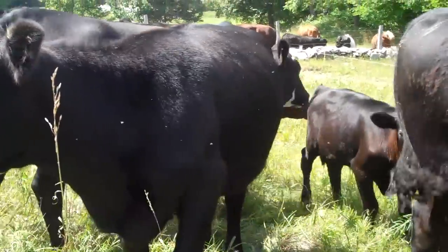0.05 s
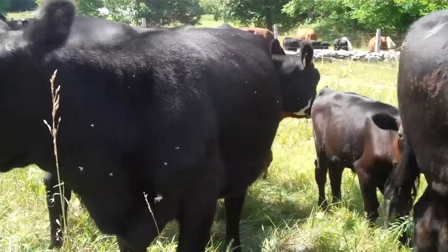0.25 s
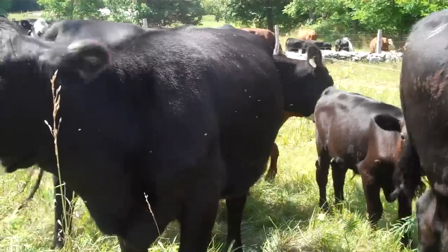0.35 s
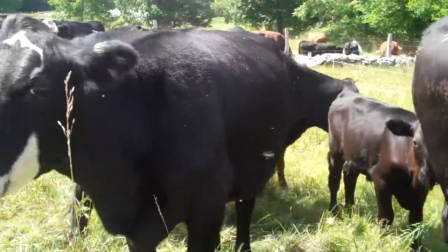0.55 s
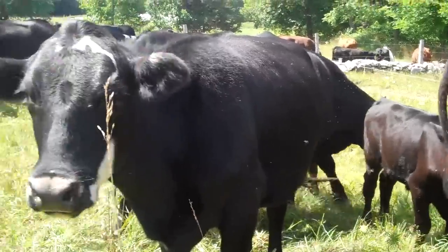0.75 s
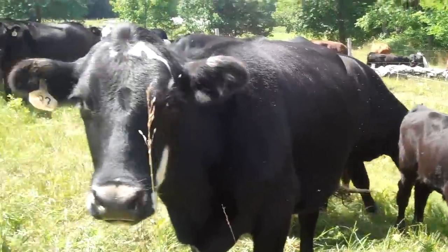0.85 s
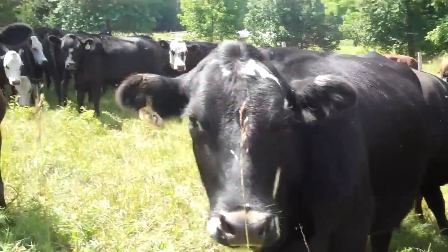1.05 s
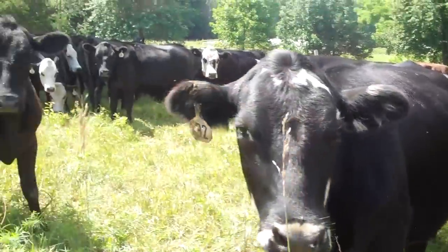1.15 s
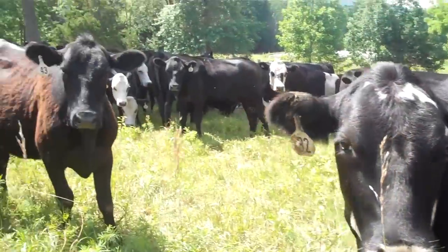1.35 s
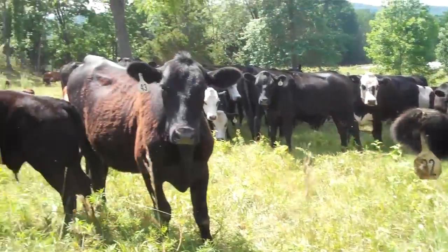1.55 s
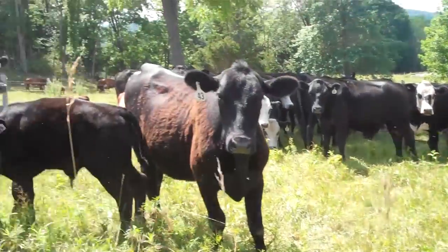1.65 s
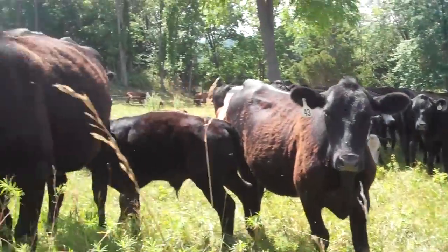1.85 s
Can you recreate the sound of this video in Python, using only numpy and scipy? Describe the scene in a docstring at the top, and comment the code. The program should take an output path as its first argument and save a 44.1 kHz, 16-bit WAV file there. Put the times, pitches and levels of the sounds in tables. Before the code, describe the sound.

Cattle mooing in an open pasture, close handheld microphone: a quieter cow hums and breaks into a high note, a nearer cow swells into a strong brassy moo, then only faint rustle, a soft thud and a farther moo beginning.

```python
"""On a pasture a cow moos close by: the pitch climbs, the mouth opens, the note is held and sinks.
A second cow breaks from a low hum into a high held note and back. Each voice is a train of vocal
pulses and breath noise through throat resonances. The herd lows far off as blurred noise bands, a hoof
thuds softly and a farther cow starts up, over shaped noise for rustling grass and low wind."""
import sys
import numpy as np
from scipy import signal
from scipy.fft import rfft, irfft, next_fast_len
from scipy.io import wavfile
from scipy.ndimage import uniform_filter1d

SR = 44100
rng = np.random.default_rng(int(sys.argv[2]) if len(sys.argv) > 2 else 0)


def to_wav(s):
    """Save 16-bit WAV."""
    ch = np.atleast_2d(s).T  # columns
    pcm = np.round(np.clip(ch, -1, 1) * 32767)  # PCM
    wavfile.write(sys.argv[1], SR, pcm.astype(np.int16))


N = 83790  # samples


def gain_of(db):
    """Decibel law: 20 dB is a tenfold amplitude."""
    return 10 ** (np.asarray(db) / 20)


def evened(x):
    """Power normalisation: scales the whole signal to an RMS of one."""
    return x / np.sqrt(np.mean(x ** 2) + 1e-20)


def smooth_noise(shape, size, passes=1):
    """Low-pass random fluctuation: white noise under a moving average, at an RMS of one."""
    x = rng.standard_normal(shape)
    for _ in range(passes):
        x = uniform_filter1d(x, size=size)
    return evened(x)


def read(points, hz):
    """Interpolation on a logarithmic frequency axis."""
    f, value = np.transpose(points)
    return np.interp(np.log(hz + 1), np.log(f + 1), value)


def columns(table):
    """Linear interpolation in time: each column at every sample, and a gate with 8 ms ends."""
    rows, t = np.array(table, float), np.arange(N) / SR
    start, end = rows[0, 0], rows[-1, 0]
    # a curve that meets either end of the scene stays open there
    opening = np.clip((t - start) / .008 + (start < .01), 0, 1)
    closing = np.clip((end - t) / .008 + (end > N / SR - .02), 0, 1)
    return [np.interp(t, rows[:, 0], c) for c in rows[:, 1:].T] + [opening * closing]


def resonate(x, hz, width):
    """Heterodyne resonance: shifts the curve hz down to zero, smooths with one pole, shifts back."""
    turn = np.exp(2j * np.pi * np.cumsum(hz * np.ones(len(x))) / SR)
    r = np.exp(-np.pi * width / SR)
    return 2 * (turn * signal.lfilter([1 - r], [1, -r], x / turn)).real


def steady(x):
    """Short-time power normalisation: evens the loudness over a few cycles."""
    power = uniform_filter1d(uniform_filter1d(x ** 2, size=900), size=900)
    return x / np.sqrt(abs(power) + 1e-12)


JITTER = .04  # RMS share of the pitch at full breath


def folds(hz, slope_db, breath, sub, count):
    """Glottal source: harmonics of a pitch that breath makes less even, and a puff of air each cycle."""
    breath = np.clip(breath, 0, 1)
    turns = np.cumsum(hz * (1 + JITTER * breath * smooth_noise(N, 200))) / SR
    tone = 0
    for k in range(1, count):
        strength = gain_of(slope_db * np.log2(k)) * (k * hz < 13000)
        tone = tone + strength * np.cos(2 * np.pi * k * turns)
    puffs = (0.35 + np.exp(-(turns % 1) / 1.3)) * rng.standard_normal(N)
    strong_weak = 1 + sub * np.cos(np.pi * turns)  # every other cycle is stronger
    return steady(tone) * strong_weak + breath * evened(puffs)


SPLIT_HZ = 2300  # between the low and the high throat tuning
WAVER_DB = 1.8  # RMS; each resonance swells and fades by chance


def throat(drive, table, mouth, low, high):
    """Formant filtering: resonances whose strengths blend from shut to open mouth and waver."""
    waver = smooth_noise((len(table), N), 1000, passes=2)
    voice = 0
    for k, (f, width, shut_db, open_db) in enumerate(table):
        hz = f * (low if f < SPLIT_HZ else high)
        formant = resonate(resonate(drive, hz, width), hz, 5 * width)
        level_db = shut_db + (open_db - shut_db) * mouth + WAVER_DB * waver[k]
        voice = voice - (-1) ** k * gain_of(level_db) * formant
    return voice


FIELD_DB, FIELD_T60_S = -21, .1  # echo level toward 0 Hz, and decay time
ECHO_BRIGHT_HZ = 2300  # here the echo amplitude has doubled
TREBLE_PAN_DB_PER_KHZ = 1.67  # difference between the ports, growing from 3 to 7 kHz


def placed(x, lead_s, pan_db):
    """Interaural cues: the left port leads by lead_s, the far port is shaded, the field echoes brightly."""
    size = next_fast_len(N + SR)
    hz, t = np.fft.rfftfreq(size, 1 / SR), np.arange(SR // 2) / SR
    tail = rng.standard_normal((2, len(t))) * gain_of(-60 * t / FIELD_T60_S) * (t > .008)
    port = np.array([[1], [-1]]) / 2
    shade_db = TREBLE_PAN_DB_PER_KHZ * np.clip(hz / 1000 - 3, 0, 4) * np.sign(lead_s) * port
    direct = np.exp(2j * np.pi * hz * lead_s * port) * gain_of(shade_db)
    echo = gain_of(FIELD_DB) * (1 + hz / ECHO_BRIGHT_HZ) * rfft(tail / np.linalg.norm(tail[0]), size)
    return irfft(rfft(x, size) * (direct + echo), size)[:, :N] * gain_of(pan_db * port)


# Rustle spectrum. Each row: frequency in Hz, relative density in dB per Hz.
GRASS_SPECTRUM = [(59, -71), (100, -12.5), (300, -19.5), (900, -8.5), (1300, -16), (3000, -21.5),
                  (8160, -24), (10500, -25), (12000, -32), (14000, -31.5)]
# Rustle swells. Each row: time in seconds, level in dB.
GRASS_SWELLS = [(0, -41), (.2, -36), (.5, -31), (.9, -40.5), (1.08, -37.5), (1.13, -52.5), (1.36, -53.5),
                (1.4, -46), (1.44, -54.5), (1.9, -47)]
# Coherence of the two ports. Each row: frequency in Hz, left-right likeness from -1 to 1.
GRASS_LIKENESS = [(60, 0.25), (180, 0.6), (520, 0.92), (1550, 0.68), (4580, 0.083), (13500, -0.21)]
CALM_DB, LOW_SHARE = -54, .55  # below 2 kHz the level follows this share of each swell above calm


def grass():
    """Filtered diffuse noise: the field's rustle and hiss, patchy in time and frequency."""
    frames, hz = N // 128 + 5, np.fft.rfftfreq(512, 1 / SR)
    a, b, c, d, patches = rng.standard_normal((frames, 257, 5)).T
    patches = evened(uniform_filter1d(uniform_filter1d(patches, 12, 0), 10, 1))
    flicker = smooth_noise(frames, 4)
    same = np.clip(read(GRASS_LIKENESS, hz), -1, 1)[:, None]
    left = a + 1j * b
    right = same * left + np.sqrt(1 - same ** 2) * (c + 1j * d)
    spectrum_db = read(GRASS_SPECTRUM, hz)[:, None] + 0.88 * patches + 0.99 * flicker
    z = np.array([left, right]) * gain_of(spectrum_db)
    rustle = evened(signal.istft(z, nperseg=512, noverlap=384)[1][:, :N])
    db = columns(GRASS_SWELLS)[0]
    low = signal.sosfiltfilt(signal.butter(2, 2000, fs=SR, output="sos"), rustle)
    low_db = CALM_DB + LOW_SHARE * (db - CALM_DB)
    return (gain_of(db) * (rustle - low) + gain_of(low_db) * low) * gain_of([[-.8], [.8]])


# Wind strength. Each row: time in seconds, level in dB.
WIND_LEVEL = [(0, -54), (.45, -61), (.55, -62), (.9, -82), (1.1, -66), (1.9, -62)]


def wind():
    """Low-frequency turbulence noise: a lumpy rumble on the microphone, nearly alike in both ports."""
    band = signal.butter(2, [34, 81], "band", fs=SR, output="sos")
    x = signal.sosfilt(band, rng.standard_normal((2, N)))
    apart = .22 * np.array([[1], [-1]])
    return gain_of(columns(WIND_LEVEL)[0]) * evened(x[0] + apart * x[1]) * gain_of([[-1], [1]])


# Second cow's three registers. Each row: time in seconds, pitch in Hz, level in dB,
# overtone slope in dB per octave, breath from 0 to 1.
HUM_REGISTER = [(0.0, 140.5, -37, -11.5, 0.3), (0.04, 159.7, -38.5, -20, 0.3),
                (0.095, 196.4, -35.5, 10.5, 0.9)]
HIGH_REGISTER = [(.07, 490, -52, 9, .3), (.11, 530, -46, 6, .25), (.145, 578, -35, 0, .05),
                 (.2, 579, -31, -1, .03), (.36, 577, -28, -2, .04), (.43, 590, -27, -5, .05),
                 (.455, 585, -32, -8, .05), (.47, 570, -50, -8, .05)]
LOW_REGISTER = [(.45, 266, -51, -11, 0.12), (.49, 248, -36, -36, .1), (.53, 238.5, -27, -28, .1),
                (.56, 206, -32.5, -44, .05), (.65, 203, -38, -14, 0.068), (.69, 222.3, -36.5, -23, 0.12),
                (.79, 212, -42, -34, 0.08), (.84, 204, -44, -4, 0.028), (.885, 138.8, -37.5, 1.5, 0.08),
                (.91, 127, -77, -12, 0.047)]
# Its throat. Each row: resonance in Hz, width in Hz, relative strength in dB.
SECOND_THROAT = [(202, 120, 18.5), (690, 233, 12.5), (960, 190, 12), (1700, 130, 2), (2160, 410, -14.5)]


def second_cow():
    """Source-filter voice with register breaks: three pulse trains through one fixed throat."""
    call = 0
    for register in (HUM_REGISTER, HIGH_REGISTER, LOW_REGISTER):
        hz, db, slope_db, breath, gate = columns(register)
        drive = folds(hz, slope_db, breath, 0, count=12)
        voice = 0
        for k, (f, width, strength_db) in enumerate(SECOND_THROAT):
            voice = voice + (-1) ** k * gain_of(strength_db) * resonate(drive, f, width)
        call = call + steady(voice) * gain_of(db) * gate
    return call


# Near cow's effort. Each row: time in seconds, level in dB, mouth opening from 0 to 1,
# gain of the fundamental in dB.
NEAR_EFFORT = [(.06, -54, 0.2, 18), (.22, -39.5, 0.14, 5), (.3, -31, 0.34, 6), (.36, -28, 0.33, 2),
               (.378, -20.5, 0.44, -4), (.49, -16, 0.51, -7.5), (.55, -13.5, 0.62, -7),
               (.67, -14.5, 0.62, -10), (.72, -14, 0.66, -28), (.8, -14, 0.71, -49),
               (.92, -15.5, 0.83, -18), (.97, -19, 0.7, -19), (1.018, -22, 0.78, -2.5),
               (1.054, -25.5, 0.61, -7), (1.092, -33.5, 0.61, 5), (1.115, -57, 0.6, -4)]
# Its folds. Each row: time in seconds, pitch in Hz, breath from 0 to 1.
NEAR_FOLDS = [(.06, 99, .08), (.164, 110.2, .05), (.222, 112.6, .04), (.314, 121.1, .04),
              (.366, 128.4, .08), (.388, 130.2, .12), (.496, 142, .14), (.6, 151.6, .1),
              (.668, 158.3, .045), (.72, 163.1, .025), (.752, 165, .02), (.81, 165.9, .015),
              (.88, 165.1, .02), (.912, 163.7, .025), (.96, 158.4, .03), (1.008, 147.3, .04),
              (1.03, 141, .05), (1.054, 130, .06), (1.092, 108.5, .1), (1.115, 99, .15)]
# Strong-weak pulses as the mouth opens. Each row: time in seconds, depth from 0 to 1.
NEAR_UNEVEN = [(.36, 0), (.39, .22), (.56, 0)]
# Its throat. Each row: resonance in Hz before tuning, width in Hz,
# relative strength in dB with the mouth shut, the same with it open.
NEAR_FORMANTS = [(130, 67, 11, -41.5), (317, 209, 4.5, -17.5), (590, 99, -14.5, 2), (937, 137.5, -1.5, 2.5),
                 (1532, 158, -15.5, 8.5), (1976, 84.2, -8.5, 15.5), (2590, 120, -12, -7),
                 (3090, 120, 0, -7), (3880, 150, 2, -4), (4500, 170, -8, -9), (5780, 160, -35, -41),
                 (7700, 370, -54, -26.5)]
# Tuning of the throat. Each row: time in seconds, ratio below SPLIT_HZ, ratio above.
NEAR_TUNING = [(.3, .95, .92), (.4, .98, .95), (.56, .99, 1.02), (.6, .98, .98), (.75, 1, 1.0),
               (1.1, 1, 1.02)]
# Nasal resonance sliding down before the mouth opens. Each row: time in seconds, Hz, relative dB.
NASAL = [(.12, 3300, -20), (.22, 3080, 13), (.3, 2760, 6.5), (.37, 2660, -1), (.55, 2760, -1)]
# Thin top resonance drifting with the lips. Each row: time in seconds, Hz, relative dB.
LIP_RESONANCE = [(.4, 6300, -23), (.5, 6770, -26.5), (.7, 7300, -28), (.75, 6400, -27), (.9, 6730, -20.5),
                 (1.08, 7100, -30.5)]
# Chest boom as the mouth closes. Each row: time in seconds, Hz, relative dB.
CHEST_BOOM = [(.98, 400, -30), (1.05, 358, -2), (1.11, 320, -7)]
# Antiresonances. Each row: frequency in Hz before tuning, width in Hz, depth from 0 to 1.
ANTIRESONANCES = [(1350, 160, 1)]
SNAP_HZ, SNAP_DB = (2300, 4700), -9  # band of the bright click, and its gain with the mouth wide open
SPREAD_S_PER_KHZ = .0008  # delay growing up to 2.6 kHz


def near_cow():
    """Source-filter voice: clean pulses through a throat whose upper formants wake as the mouth opens."""
    hz, breath, _ = columns(NEAR_FOLDS)
    db, mouth, first_db, gate = columns(NEAR_EFFORT)
    low, high, _ = columns(NEAR_TUNING)
    drive = folds(hz, 0, breath, columns(NEAR_UNEVEN)[0], count=100)
    voice = throat(drive, NEAR_FORMANTS, mouth, low, high)
    # the folds slap shut with a bright click
    snap = signal.sosfilt(signal.butter(4, SNAP_HZ, "band", fs=SR, output="sos"), drive)
    voice = voice + mouth * gain_of(SNAP_DB) * snap
    for table, width in (NASAL, 114), (LIP_RESONANCE, 350), (CHEST_BOOM, 110):  # widths in Hz
        f, level_db, sounding = columns(table)
        extra = resonate(resonate(drive, f, width), f, 5 * width)
        voice = voice + sounding * gain_of(level_db) * extra
    # raise or lower the fundamental alone
    voice = voice - (1 - gain_of(first_db)) * resonate(voice, hz, 40)
    for f, width, depth in ANTIRESONANCES:
        voice = voice - np.clip(depth, 0, 1) * resonate(voice, f * low, width)
    voice = signal.sosfilt(signal.butter(4, 85, "high", fs=SR, output="sos"), voice)
    # dispersion: the treble of each pulse comes later
    delay_khz = np.minimum(np.fft.rfftfreq(N, 1 / SR), 2600) / 1000
    spread = np.exp(-2j * np.pi * np.cumsum(SPREAD_S_PER_KHZ * delay_khz) * SR / N)
    return -irfft(rfft(steady(voice) * gain_of(db) * gate) * spread, N)


# Distant lowing, one table for each blurred band. Each row: time in seconds, centre in Hz,
# level in dB before the waver.
LOWING_BANDS = [
    [(1.0, 860, -51), (1.28, 920, -64), (1.9, 810, -59.5)],
    [(1.0, 264, -60), (1.54, 360, -55), (1.685, 380, -46), (1.78, 354, -53)],
]


def lowing():
    """Narrow-band noise: far voices blurred into broken bands that waver by chance."""
    bands = 0
    for table in LOWING_BANDS:
        hz, db, gate = columns(table)
        waver_db = 2.5 * smooth_noise(N, 1500)
        blur = resonate(resonate(rng.standard_normal(N), hz, 280), hz, 260)
        bands = bands + gate * gain_of(db + waver_db) * evened(blur)
    return bands


THUD_S, THUD_DB, THUD_HZ = 1.396, -45, 135  # start, envelope peak, pitch
THUD_RING_S = 0.0083  # rise time and decay constant


def hoof():
    """Damped oscillation: one soft thud on the turf."""
    t = np.maximum(np.arange(N) / SR - THUD_S, 0)
    u = t / THUD_RING_S
    return gain_of(THUD_DB) * np.e * u * np.exp(-u) * np.sin(2 * np.pi * THUD_HZ * t)


# Farther cow starting up. Each row: time in seconds, pitch in Hz, level in dB,
# mouth opening from 0 to 1, breath from 0 to 1.
FAR_CALL = [(1.7, 104.1, -48.5, 0.4, 0.13), (1.77, 131.9, -46, 0, 1), (1.805, 140.6, -37, 0.07, 1),
            (1.825, 147.7, -41, 0.9, 1), (1.875, 158, -41, 0.95, 1), (1.9, 147, -41.5, 0.5, 0.5)]
# Its throat. Each row: resonance in Hz before tuning, width in Hz,
# relative strength in dB with the mouth shut, the same with it open.
FAR_FORMANTS = [(132, 120, -3.5, -17), (315, 48, 13, -9), (680, 91, -1.5, -1.5), (1020, 47, -4, 8.5),
                (1560, 260, -13, -12.5), (2140, 62, -17.5, -7)]


def far_cow():
    """Source-filter voice: a soft hum that opens into a moo."""
    hz, db, mouth, breath, gate = columns(FAR_CALL)
    drive = folds(hz, 0, breath, 0, count=20)
    voice = throat(drive, FAR_FORMANTS, mouth, low=0.94, high=1)
    return steady(voice) * gain_of(db) * gate


def scene():
    """Superposition: the placed voices and thud add to the grass and wind."""
    second = second_cow()
    far = far_cow() + lowing() + hoof()
    # left lead in seconds, left-over-right level in dB
    voices = placed(near_cow(), 0.00012, -1.47)
    voices = voices + placed(second, .00007, -2.5)
    voices = voices + placed(far, -0.000027, -2)
    return voices + grass() + wind()


MIC_HZ, EDGE_HZ = 10160, 14120  # corners of the gentle roll-off and the steep band limit


def record(dry):
    """Low-pass response: the microphone rolls off the top treble, then a steep filter limits the band."""
    soft = signal.sosfilt(signal.butter(4, MIC_HZ, fs=SR, output="sos"), dry)
    band_limit = signal.firwin(2047, EDGE_HZ, window=("kaiser", 9), fs=SR)
    return signal.oaconvolve(soft, band_limit[None], "same")


dry = scene()
out = record(dry)
to_wav(out)
```